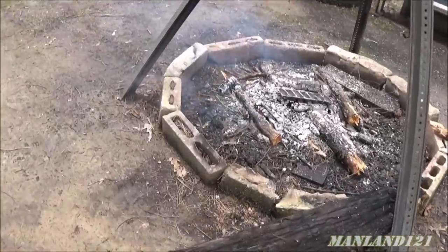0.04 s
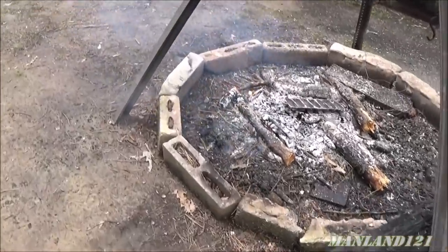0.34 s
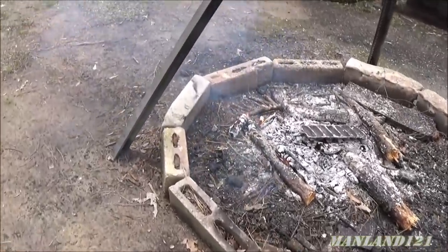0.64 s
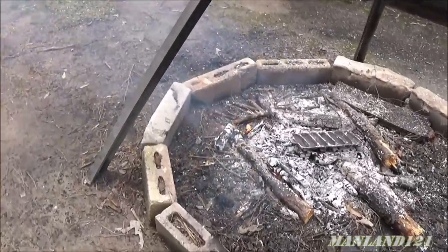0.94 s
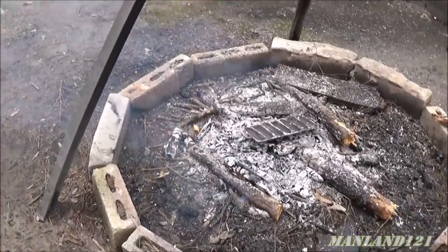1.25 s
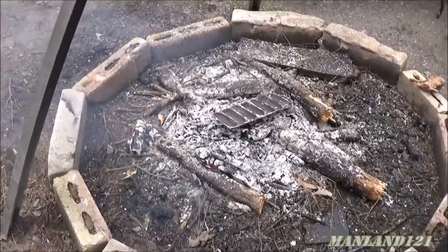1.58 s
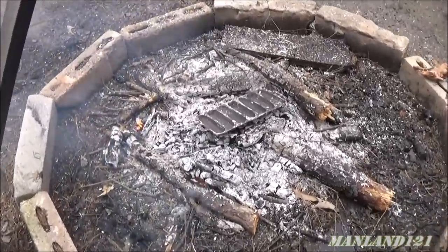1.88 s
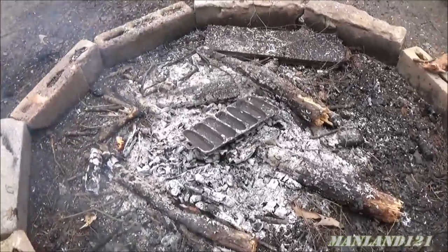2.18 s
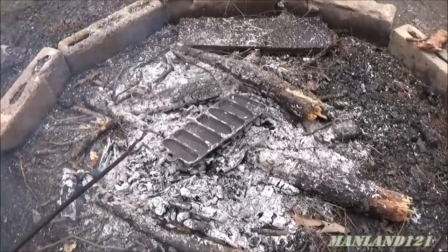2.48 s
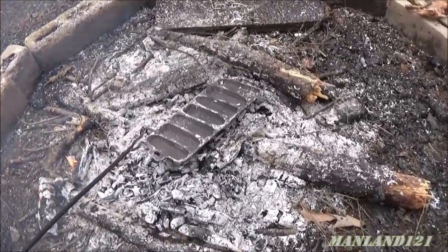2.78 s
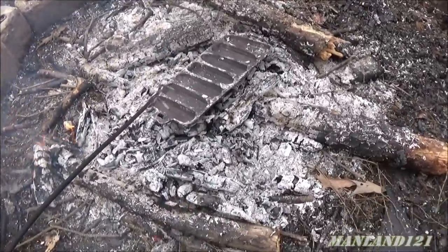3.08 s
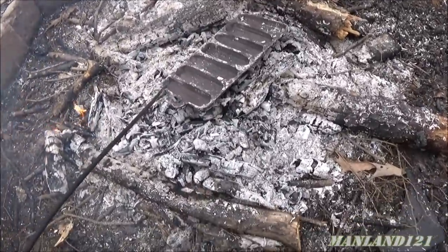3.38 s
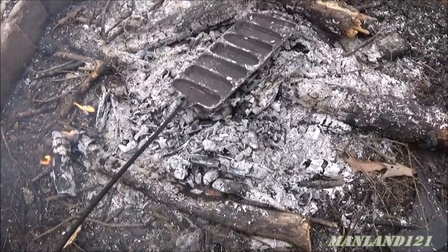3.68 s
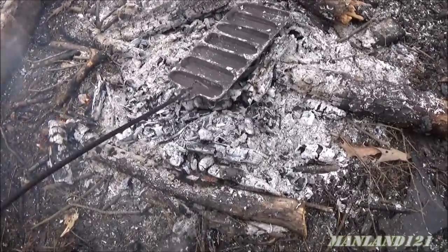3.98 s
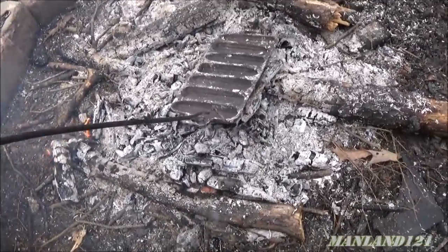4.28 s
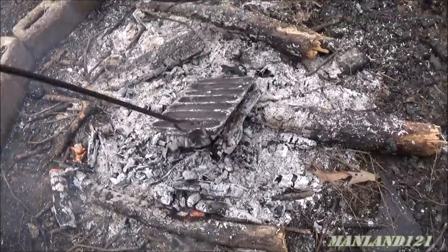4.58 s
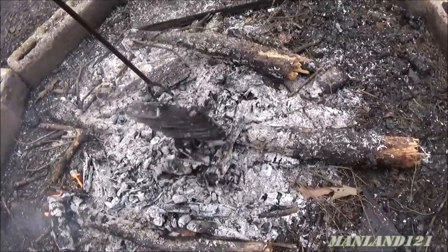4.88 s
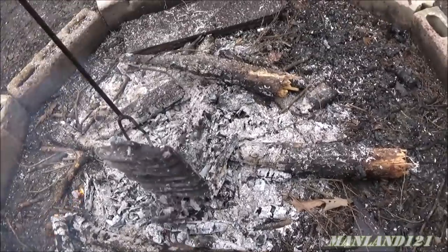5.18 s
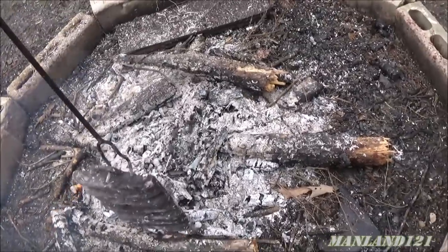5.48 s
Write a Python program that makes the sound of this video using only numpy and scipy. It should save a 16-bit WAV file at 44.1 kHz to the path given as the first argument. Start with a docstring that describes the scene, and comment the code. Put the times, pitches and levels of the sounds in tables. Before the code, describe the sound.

A smouldering outdoor fire pit sizzles faintly, with sharp, close snaps of wood throughout. Soft footsteps cross dirt and twigs while a bird in the trees repeats a quick whistled phrase. Past the middle, a steel hook clinks several times on a cast iron pan. The pan then scrapes and judders over crunching charcoal, and ash pours off in a bright hiss that trickles away.

```python
"""Outdoors at a fire pit, embers sizzle and wood snaps as its fibres break. Someone steps up over dirt
and twigs while a bird repeats its whistled phrase in the trees and a distant one calls once.
A steel hook strikes a cast iron pan in the embers, exciting the metal's normal modes, and drags it up.
The pan judders over the coals by stick-slip friction, and ash crunches and pours off it."""
import sys
import numpy as np
from scipy import signal
from scipy.fft import rfft, irfft
from scipy.io import wavfile
from scipy.ndimage import uniform_filter1d, minimum_filter1d

SR = 44100
rng = np.random.default_rng(int(sys.argv[2]) if len(sys.argv) > 2 else 0)


def log_audio(samples):
    """Write samples as a 16-bit WAV file to the path given in sys.argv[1]."""
    # one column per channel
    frames = np.atleast_2d(samples).T
    # limit to full scale, then quantise
    limited = np.clip(frames, -1, 1)
    pcm = np.round(limited * 32767).astype(np.int16)
    wavfile.write(sys.argv[1], SR, pcm)


N = 249165
TIME = np.arange(N) / SR

# swell of the background: (time [s], sizzle level [dB], air level [dB])
AMBIENT_LEVELS = [(0.0, -58.5, -54.5), (1.68, -52.5, -51.5), (1.88, -49, -49.5), (2.22, -54, -50.5),
                  (2.69, -60, -59.5), (2.99, -57, -61), (3.3, -58, -59.5)]
# normal modes of hook and pan: (frequency [Hz], t60 [s], level struck on rim [dB], flat [dB], corner [dB])
IRON_MODES = [(700, .14, -24, -31, -29), (1093, .13, -25, -29, -30), (1190, .1, -35, -42, -45),
              (1448, .24, -31, -30, -27), (2078, .18, -33, -50, -44), (2309, .18, -43, -36, -32),
              (3565, .17, -21, -18, -21), (3671, .13, -27, -28, -36), (4135, .13, -23, -16, -18),
              (4195, .12, -21, -21, -24), (4617, .16, -11, -8, -13), (4662, .16, -11, -22, -20),
              (4924, .14, -12, -15, -9), (5045, .14, -32, -28, -16), (5258, .11, -6, -28, -15),
              (5428, .125, -1, -21, -19), (5685, .09, -21, -29, -28), (6212, .09, -21, -21, -31),
              (6353, .15, -18, -42, -29), (6490, .12, -22, -19, -18), (6887, .13, -29, -24, -22),
              (8420, .12, -37, -30, -26), (8775, .11, -23, -16, -33), (8950, .09, -35, -28, -38),
              (9710, .1, -31, -35, -42), (11330, .09, -35, -35, -38), (12110, .08, -48, -33, -48),
              (12880, .09, -38, -40, -52)]


def undb(db):
    """Amplitude ratio of a level in decibels."""
    return 10 ** (np.asarray(db) / 20)


def unit(x, first_s=np.inf):
    """Normalisation to rms 1, taken over the whole signal or only its first seconds."""
    return x / np.sqrt(np.mean(x[TIME[:len(x)] < first_s] ** 2))


def curves(table):
    """Linear interpolation of each column of a timed table."""
    times, *columns = np.transpose(table)
    return [np.interp(TIME, times, column) for column in columns]


def fade(t, t60):
    """Exponential damping, 60 dB down after t60."""
    return np.exp(-np.log(1000) * t / t60)


def arch(t, length):
    """Half-sine window of the given length, then silence."""
    return np.sin(np.pi * np.minimum(t / length, 1)).clip(0)


def phase_of(hz):
    """Phase as the running integral of frequency."""
    return 2 * np.pi * np.cumsum(hz) / SR


def wander(rate, n=N):
    """Random modulation: straight lines between Gaussian values, rate of them a second."""
    return np.interp(TIME[:n] * rate, np.arange(1000), rng.standard_normal(1000))


def add(track, start, sound):
    """Superposition of a sound on a track, from start in seconds."""
    i = max(int(start * SR), 0)
    track[i:i + len(sound)] += sound[:N - i]


def colour(x, spectrum):
    """Spectral shaping by points of (frequency [Hz], level [dB]); rms 1."""
    hz, db = np.transpose(spectrum)
    bin_hz = np.maximum(np.fft.rfftfreq(len(x), 1 / SR), 1)
    gain = undb(np.interp(np.log(bin_hz), np.log(hz), db))
    return unit(irfft(rfft(x) * gain, len(x)))


def resonate(x, hz, q):
    """Second-order resonance with quality factor q."""
    w = 2 * np.pi * min(hz, .42 * SR) / SR
    a = np.sin(w) / (2 * q)
    return signal.lfilter([a, 0, -a], [1 + a, -2 * np.cos(w), 1 - a], x)


def soften(x, hz):
    """Second-order low-pass."""
    return signal.sosfilt(signal.butter(2, hz, fs=SR, output="sos"), x)


def grains(rate, spread_db, t60):
    """Shot noise: tiny fractures at random moments, mostly weak, each with a short tail; rms 1."""
    breaks = rng.random(N) < rate / SR
    size = np.minimum(rng.exponential(size=N), 4.5)
    clicks = breaks * rng.choice([-1, 1], N) * undb(spread_db * size)
    tail_energy = signal.lfilter([1], [1, -fade(1 / SR, t60) ** 2], clicks ** 2)
    tails = np.sqrt(tail_energy) * rng.standard_normal(N)
    return unit(unit(clicks) + unit(tails))


def crumbs(pitches_hz, rate, spread_db, t60, clump_db):
    """Granular noise: each size of crumb resonates at its own pitch and breaks in clumps; rms 1."""
    out = np.zeros(N)
    for hz in pitches_hz:
        band = unit(resonate(grains(rate, spread_db, t60), hz, q=.66))
        out += band * np.sqrt(hz) * undb(clump_db * wander(90))
    return unit(out)


def surround(x, t60, wet_db):
    """Direct sound plus a diffuse field, which differs at the two ears between bass and treble."""
    t = TIME[:SR]
    tails = rng.standard_normal((2, SR)) * fade(t, t60) * (1 - np.exp(-t / .0008))
    mid, side = (undb(wet_db) * signal.fftconvolve(x, unit(tail) / np.sqrt(SR))[:N] for tail in tails)
    side = signal.sosfilt(signal.butter(1, [380, 9000], "band", fs=SR, output="sos"), side)
    return x + .75 * mid + side * np.array([[1], [-1]])


def air():
    """Ambient noise: the low sound of outdoor air; the background swells with the shuffling of someone walking
    to the pit."""
    # spectrum of the air: (frequency [Hz], level [dB])
    spectrum = [(12, -35), (20, 0), (118, 3.5), (164, 1), (357, -2), (710, -6.5), (793, -7), (1080, -5),
                (1480, -6.5), (1680, -7), (2630, -13), (3070, -14.5), (4000, -15), (5200, -13.5),
                (8800, -120)]
    _, air_db = curves(AMBIENT_LEVELS)
    return undb(air_db + 2.5 + 1.53 * wander(6.58)) * colour(rng.standard_normal(N), spectrum)


def embers():
    """Continuous and impulsive noise with one spectrum: embers sizzle and cinders tick."""
    # spectrum of the embers: (frequency [Hz], level [dB])
    spectrum = [(1500, -32), (2600, 2.5), (3700, -7), (6400, -3.5), (10400, -2), (13000, -7), (16000, -13)]
    sizzle_db, _ = curves(AMBIENT_LEVELS)
    sizzle = colour(rng.standard_normal(N), spectrum) * undb(.5 + .78 * wander(7.2))
    cinders = crumbs([4000, 7000, 11000], rate=70, spread_db=4.2, t60=.008, clump_db=1.5)
    return undb(sizzle_db) * (sizzle + undb(1) * colour(cinders, spectrum))


def distant_call():
    """A frequency glide: a far bird's thin tone slides up quickly, then sags."""
    from_hz, top_hz, rise_s, sag_hz_per_s = 6200, 7700, .011, 4000
    out, t = np.zeros(N), TIME[:SR // 4]
    hz = top_hz + (from_hz - top_hz) * np.exp(-t / rise_s) - sag_hz_per_s * t
    envelope = undb(-40) * fade(t, t60=.13) * np.sqrt(arch(t, length=.13))
    add(out, start=2.68, sound=envelope * np.sin(phase_of(hz)))
    return out


def birdsong():
    """Frequency-modulated tones: a phrase of six gliding whistles, sung five times."""
    # phrases: (time [s], level [dB])
    phrases = [(0.232, -43), (0.651, -38.5), (1.058, -37.5), (1.477, -38.5), (1.902, -41)]
    # notes: (time in phrase [s], length [s], start pitch [Hz], end pitch [Hz], arch [Hz], level [dB])
    notes = [(-.003, .04, 3650, 3030, -4, -2.5), (.036, .042, 2700, 2200, -110, 1.5),
             (.11, .032, 2450, 2720, 8, 5.5), (.152, .034, 2860, 2980, -6, -1.5),
             (0.19, .055, 1993, 1847, -67, -6.5), (.228, .05, 1850, 1850, 377, -2)]
    warble, pitch_spread, flutter_db = .019, .011, .5
    out, t = np.zeros(N), TIME[:SR // 4]
    for start, db in phrases:
        for offset, length, from_hz, to_hz, arch_hz, note_db in notes:
            swell = arch(t, length)
            hz = np.interp(t, [0, length], [from_hz, to_hz]) + arch_hz * swell
            hz *= 1 + warble * wander(246, len(t))
            hz *= 1 + pitch_spread * rng.standard_normal()
            envelope = undb(db + note_db - flutter_db * wander(165, len(t))) * swell
            add(out, start + offset, envelope * np.sin(phase_of(hz)))
    return out


def among_trees(x):
    """Scattering by trees: the direct sound and a long reverberation, mostly common to both ears."""
    echoes = surround(x, t60=.86, wet_db=-2.5) - x
    return undb(-1) * x + undb(-2.5) * echoes.mean(axis=0) + undb(-9) * echoes


def steps():
    """Damped impacts: soles thud on the ground and grind the grit under them; at the end the pan settles onto
    the ash."""
    # shoes on dirt and twigs, and last the pan set down on the ash: (time [s], peak level of the thud [dB],
    # pitch [Hz])
    thuds = [(0.107, -34, 380), (0.377, -36, 121.3), (0.48, -33.5, 280), (0.675, -26, 1590),
             (1.043, -30.5, 118.7), (1.126, -34, 468), (1.242, -38.5, 200), (1.708, -36, 176),
             (1.849, -30, 300), (1.891, -27.5, 1440), (2.55, -38, 384), (3.277, -36, 1280),
             (5.46, -33, 420)]
    out, t = np.zeros(N), TIME[:SR // 4]
    grit = crumbs([400, 650, 1100, 1800], rate=600, spread_db=2.5, t60=.012, clump_db=1.5)
    grit = colour(grit, [(150, -9), (550, 7.5), (1000, 0), (2000, -5), (4500, -2.5)])
    for start, db, hz in thuds:
        t60 = .069 * (300 / hz) ** .45  # deeper thuds last longer
        load = fade(t, t60) * (1 - np.exp(-t / .0034))
        thud = resonate(resonate(rng.standard_normal(len(t)) * load, hz, q=1.1), hz, q=.4)
        grinding = np.roll(grit, -int(start * SR))[:len(t)] * load
        add(out, start, undb(db) * (thud / np.abs(thud).max() + undb(-2) * grinding))
    return out


def snaps():
    """Brittle fracture: a breaking fibre ticks and excites the wood around it and the log below."""
    # wood and charcoal snapping: (time [s], tick peak level [dB], body level [dB], body pitch [Hz])
    fractures = [(0.0125, -23.5, -32, 2000), (0.1719, -24.5, -57, 4500), (0.2835, -18.5, -55, 2240),
                 (0.3149, -22, -34, 2300), (0.3705, -20.5, -46, 2580), (0.6386, -49, -34, 2525),
                 (0.6783, -31, -33.5, 2450), (0.7925, -17.5, -64, 2600), (0.925, -11, -31, 4830),
                 (1.0757, -18.5, -48, 3130), (1.173, -16, -35.5, 2600), (1.2339, -48, -33.5, 2040),
                 (1.6979, -22, -28, 3600), (1.9598, -26, -32.5, 4790), (2.0941, -2, -19, 2210),
                 (2.2588, -19.5, -40.5, 4450), (2.402, -17, -39.5, 4100), (2.4106, -5, -26, 3470),
                 (2.795, -25, -54, 2590), (2.8634, -28.5, -62, 2850), (2.9018, -25, -67, 2660),
                 (2.9673, -29, -42, 4100), (3.034, -26.5, -62, 2240), (3.4528, -14.5, -53, 4140),
                 (3.6152, -15, -24, 4700), (3.9229, -10, -35, 4250), (3.9923, -10, -34, 3980),
                 (4.012, -8.5, -36, 5000), (4.0842, -12.5, -35.5, 2280), (4.1046, -13.5, -35, 3060),
                 (4.136, -11, -31, 4750), (4.4167, -6, -30, 3580), (4.513, -7, -33, 3150),
                 (4.6332, -15, -44, 3150), (4.7886, -15, -26.5, 3560), (4.955, -9, -36, 4880),
                 (4.9956, -8, -40, 4200), (5.1721, -11, -45, 2990), (5.273, -12, -34.5, 4580),
                 (5.327, -17, -55, 4800), (5.5667, -11, -44, 4940)]
    log_hz, log_db = 506, -11
    out, t = np.zeros(N), TIME[:SR // 8]
    spike = np.exp(-t / .00004)
    debris = fade(t, t60=.011) + undb(-33.5) * fade(t, t60=.15)  # splintering, then crumbs settling
    for start, tick_db, body_db, hz in fractures:
        splinter, wood = rng.standard_normal((2, len(t))) * debris
        tick_hz = np.interp(tick_db, [-14, 0], [10000, 6300])  # thicker fibres snap louder and lower
        tick = resonate(spike + undb(-11) * splinter, tick_hz, q=.6)
        tick = soften(resonate(tick, tick_hz, q=.6), 12500)
        force = 2 * spike + wood
        body = soften(resonate(force, hz, q=1), 4500)
        knock = resonate(resonate(force, log_hz, q=.57), log_hz, q=.57)
        body = unit(body, first_s=.005) + undb(log_db) * unit(knock, first_s=.005)
        add(out, start + .00084, undb(tick_db) * tick / np.abs(tick).max() + undb(body_db) * body)
    return out


def spills():
    """Granular flow: ash slides off the hook and the tipped pan in bright rushes that trickle away."""
    # rushes of ash: (time [s], level [dB])
    rushes = [(3.438, -42.5), (3.98, -35.5), (4.8, -29.5), (4.94, -18.5), (5.264, -36.5), (5.5, -39.5)]
    # spectrum of sliding ash: (frequency [Hz], level [dB])
    spectrum = [(2000, -32), (4000, -6), (7000, -5.5), (10500, 3), (13000, -5), (15000, -10), (16500, -31)]
    attack_s, t60 = .01, .48
    flow = np.zeros(N)
    for start, db in rushes:
        t = np.maximum(TIME - start, 0)
        flow += undb(db) * np.minimum(t / attack_s, 1) * fade(np.maximum(t - attack_s, 0), t60)
    flakes = crumbs([5000, 8000, 11000, 14000], rate=1800, spread_db=3.3, t60=.006, clump_db=2)
    return flow * colour(flakes, spectrum)


def drag():
    """Granular friction: ash trickles, charcoal crunches, the bed shifts and grit faintly rings the pan."""
    # the pan's travel through the ash: (time [s], scraping level [dB], rumble level [dB])
    travel = [(3.9, -43.5, -54.5), (4.23, -38.5, -47.5), (4.672, -40.5, -42.5), (4.844, -38.5, -40.5),
              (4.956, -37, -38), (5.128, -41.5, -48.5), (5.24, -45.5, -54), (5.4, -49, -47.5)]
    # spectra of fine ash, charcoal and the bed: (frequency [Hz], level [dB])
    ash_spectrum = [(2000, -51), (3500, 2), (5500, -2), (7000, 1), (10500, 3.5), (12500, -4.5),
                    (15000, -9.5), (16500, -34)]
    charcoal_spectrum = [(400, -18), (800, 0), (1500, 2), (3000, 3.5), (4500, 1.5), (7000, 1.5),
                         (12000, -25)]
    bed_spectrum = [(30, -5), (70, 0.5), (125, 4.5), (280, -0.5), (520, -0.5), (800, -6), (2000, -18)]
    start_s, attack_s, jerk_db, steady_pull_db = 3.69, .42, .2, -36.5
    scrape_db, rumble_db = curves(travel)
    motion = np.clip((TIME - start_s) / attack_s, 0, 1) * undb(jerk_db * wander(40))
    flakes = crumbs([5000, 8000, 11000, 14000], rate=1400, spread_db=3.5, t60=.006, clump_db=2.5)
    lumps = crumbs([800, 1500, 2600, 4000], rate=700, spread_db=3.5, t60=.011, clump_db=3)
    settling = grains(rate=900, spread_db=2.2, t60=.025)
    # fine ash grows faster than the crunch as the pan speeds up
    trickle_db = steady_pull_db + 1.14 * (scrape_db - steady_pull_db) + 5.5
    trickle = undb(trickle_db) * colour(flakes, ash_spectrum)
    crunch = undb(scrape_db + 2.5) * colour(lumps, charcoal_spectrum)
    bed = undb(rumble_db + 3.5) * colour(settling, bed_spectrum)
    ring = sum(undb(rim_db) * resonate(crunch, hz, q=hz * t60 / 1.6) for hz, t60, rim_db, *_ in IRON_MODES)
    return motion * (trickle + crunch + bed + undb(6) * ring)


def jolt():
    """A damped low resonance: the ash bed thuds when the pan shifts in it."""
    t = TIME[:SR // 5]
    rumble = resonate(rng.standard_normal(len(t)), hz=166, q=2.9)
    return unit(soften(rumble, 360)) * fade(t, t60=.19)


def judder():
    """Stick-slip of iron on charcoal: the pan groans at the slip rate, rasps and jolts the bed."""
    # catches: (time [s], length [s], slip rate [Hz], groan level [dB], rasp level [dB], rasp pitch [Hz])
    catches = [(4.2, 0.016, 450, -53, -27, 6140), (4.306, 0.025, 208, -37, -27.5, 4620),
               (4.331, 0.031, 515, -33, -28, 3430), (4.421, 0.032, 490, -25.5, -25.5, 3240),
               (4.726, 0.02, 406, -40, -28.5, 2900), (4.8, 0.011, 170, -32.5, -23, 2850),
               (4.924, 0.012, 964, -27, -30, 1190), (4.946, 0.0092, 970, -31.5, -31, 1510)]
    out, t = np.zeros(N), TIME[:SR // 5]
    for start, length, slip_hz, groan_db, rasp_db, rasp_hz in catches:
        phase = phase_of(slip_hz * (1 + .065 * wander(120, len(t))))
        groan = undb(groan_db) * unit(np.sin(phase))
        slips = rng.standard_normal(len(t)) * (1 + .44 * np.cos(phase))
        rasp = undb(rasp_db) * unit(resonate(resonate(slips, rasp_hz, q=1.16), rasp_hz, q=.68))
        pressure = arch(t, length) ** .29
        add(out, start, pressure * (groan + rasp) + undb(groan_db - 9.5) * jolt())
    return out


def clash(t):
    """Dense modes: the hook's long thin rod adds a crowd of short-lived overtones and a burst of noise."""
    spectrum = [(300, -15), (800, -4), (1700, -17), (3000, -9.5), (5000, 0), (7500, -6.5),
                (11000, -4.5), (15000, -35)]
    overtones_hz = np.geomspace(1700, 13000, 60) * rng.uniform(.98, 1.02, 60)
    rod = sum(np.sin(2 * np.pi * (hz * t + rng.random())) for hz in overtones_hz)
    crowd = unit(rod) * fade(t, t60=.15) + rng.standard_normal(len(t)) * fade(t, t60=.07)
    return unit(colour(crowd, spectrum), first_s=.01)


def clinks():
    """Modal ringing: each blow excites the iron's modes according to where it lands, and rocks the pan."""
    # hook meets pan: (time [s], level [dB], place struck, relative clash level [dB])
    blows = [(3.34, -12.5, "corner", -14.5), (3.528, -37, "flat", -1.5), (3.5735, 0.5, "rim", -15.5),
             (3.716, -34, "corner", -16), (3.738, -1.5, "flat", -17.5), (3.7852, -8, "corner", -19)]
    # places struck, in the order of the level columns of IRON_MODES
    places = ["rim", "flat", "corner"]
    out, t = np.zeros(N), TIME[:SR // 2]
    contact = 1 - np.exp(-t / .0018)
    for start, db, place, clash_db in blows:
        column = places.index(place)
        # neighbouring modes swing in opposite directions at the point of contact
        ring = sum((-1) ** k * undb(levels_db[column]) * fade(t, t60) * np.sin(2 * np.pi * hz * t)
                   for k, (hz, t60, *levels_db) in enumerate(IRON_MODES))
        add(out, start, undb(db) * contact * (ring + undb(clash_db) * clash(t)))
        add(out, start, undb(db - 42.5) * jolt())
    return out


def scene():
    """Superposition of all sources; those in the pit are close, with weak echoes from its ring of blocks."""
    background = surround(air(), t60=.49, wet_db=-1) + surround(embers(), t60=.026, wet_db=-7)
    birds = among_trees(distant_call() + birdsong())
    fire = surround(snaps(), t60=.065, wet_db=-9)
    ground = surround(steps() + spills() + drag() + judder(), t60=.033, wet_db=-15)
    iron = surround(clinks(), t60=.031, wet_db=-15.5)
    return background + birds + fire + ground + iron


def record(dry):
    """Peak limiting with steady recovery holds down the loudest blows; a steep low-pass cuts the top."""
    ceiling, recovery_db_per_s, top_hz = .9, 200, 16100
    peak = -minimum_filter1d(-np.abs(dry).max(axis=0), 128)
    over_db = np.maximum(20 * np.log10(peak / ceiling + 1e-9), 0)
    recovery_db = recovery_db_per_s * TIME
    cut_db = np.maximum.accumulate(over_db + recovery_db) - recovery_db
    gain = undb(-uniform_filter1d(cut_db, 64))
    return signal.sosfilt(signal.ellip(10, .2, 90, top_hz, fs=SR, output="sos"), dry * gain)


dry = scene()
out = record(dry)
log_audio(out)
```